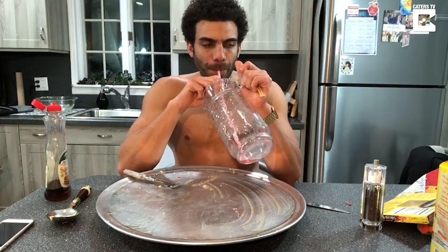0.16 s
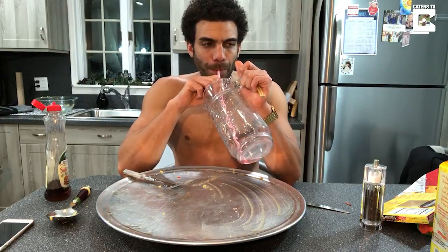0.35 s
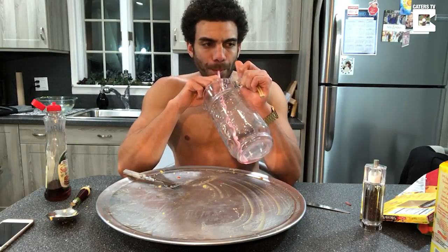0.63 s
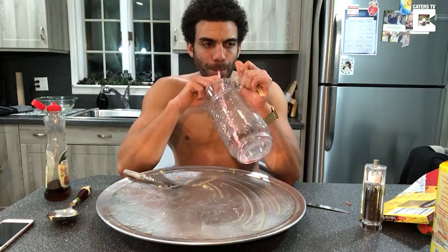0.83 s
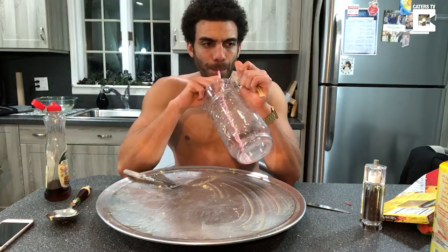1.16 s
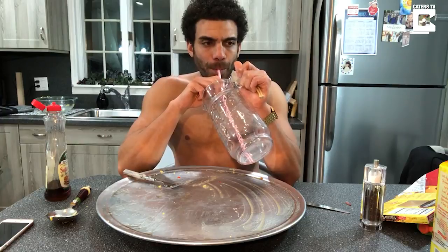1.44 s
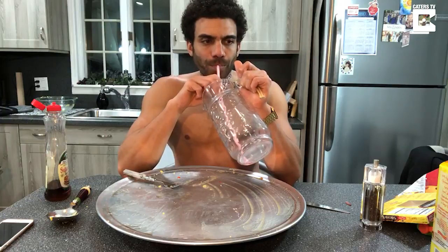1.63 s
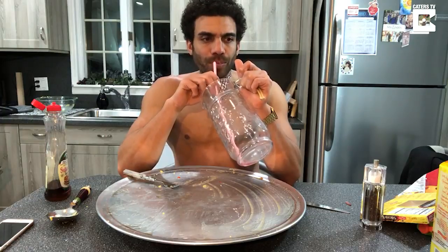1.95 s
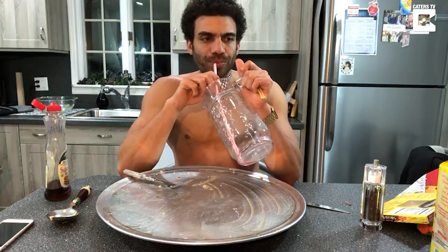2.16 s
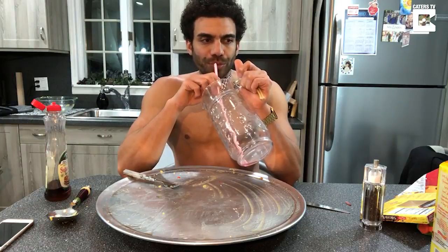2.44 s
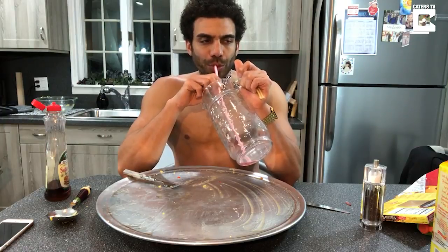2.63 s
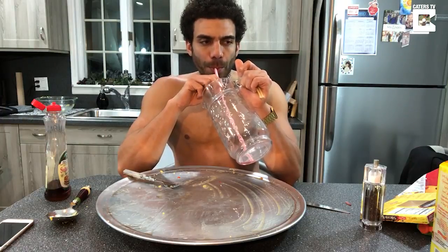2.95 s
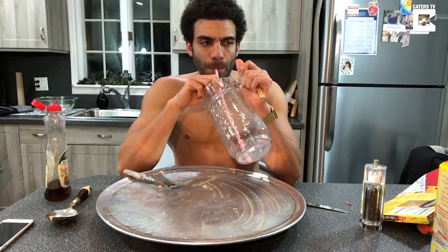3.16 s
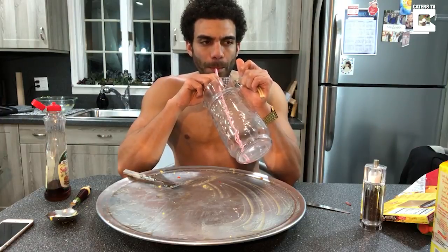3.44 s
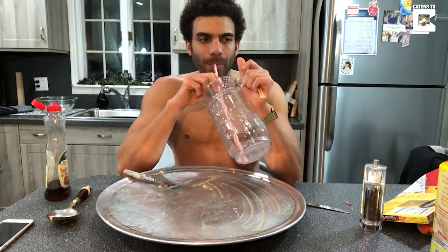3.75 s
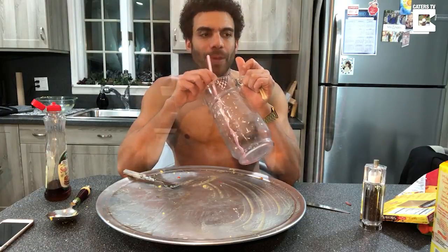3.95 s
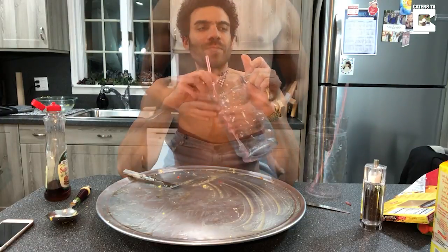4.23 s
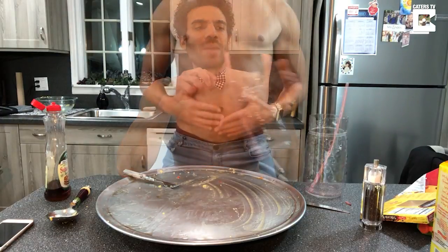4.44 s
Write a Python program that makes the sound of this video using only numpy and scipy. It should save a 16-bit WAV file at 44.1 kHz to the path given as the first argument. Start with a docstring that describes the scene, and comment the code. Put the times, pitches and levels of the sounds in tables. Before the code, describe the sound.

A close, mono take in a lightly reverberant kitchen, with very quiet, low-weighted air and a faint fridge whirr throughout. At about 0.5 s a straw begins pulling the dregs from a glass jug: first wet gulps and pops, then from 0.96 s air breaks in and the slurp turns louder, gurgling, frothy and crackling, with hollow low booms around 300 Hz. A faint straw tick on glass hides in it at 1.2 s. It breaks off around 1.3 s, leaving a short decay. Tiny lip clicks come at 1.7, 2.3 and 2.65 s. A second slurp runs from 2.8 to 3.3 s, less sprayy, with longer ringing gulps; a third, brief and raspier, from 3.45 to 3.7 s. A light glass tick follows at 3.87 s, a cluster of wet lip smacks at 3.95 s, then one strong hollow tongue cluck at 4.18 s. Soft hiss swells around 4.0-4.4 s, and a last minute lip click comes at 4.54 s.

```python
"""Straw in a nearly empty jug

In a kitchen, heard close: three pulls on a straw in a glass jug, with the room's decay under most sounds.
Gulps of air boom in the jug's cavity, films of drink pop in its resonances, spray crackles in the straw.
Straw ticks ring glass modes; lips click and a tongue cluck rings the mouth. Coloured noise makes the
kitchen air, the fridge and a hiss that swells near the end. The microphone signal is cut steeply on top."""
import sys
import numpy as np
from scipy import signal
from scipy.fft import rfft, irfft, next_fast_len
from scipy.io import wavfile
from scipy.ndimage import uniform_filter1d

SR = 44100
rng = np.random.default_rng(int(sys.argv[2]) if len(sys.argv) > 2 else 0)


def to_wav(s):
    """Save 16-bit WAV."""
    ch = np.atleast_2d(s).T  # columns
    pcm = np.round(np.clip(ch, -1, 1) * 32767)  # PCM
    wavfile.write(sys.argv[1], SR, pcm.astype(np.int16))


N = 202141
T = np.arange(N) / SR
BRIEF = T[:SR // 5]

# All table levels are relative; each source sets its share of the mix.
# Pulls: drink comes first, then air breaks into the straw, then the suction eases.
# Each row: start in seconds, air breaks in at seconds, eases off at seconds, strength in dB,
# extra spray in dB, boom build-up in seconds.
PULLS = [(0.559, 0.963, 1.269, -0.5, -0.5, 0.075), (2.805, 3.023, 3.28, -0.5, -7.5, 0.1),
         (3.439, 3.467, 3.675, -2.5, 1.5, 0.21)]
# Biggest gulps of air. Each row: start in seconds, level in dB, pitch it settles to in Hz, t60 in seconds.
GULPS = [(.579, -20.5, 466, 0.011), (0.643, -30, 316, 0.044), (.704, -33.5, 294.6, 0.21),
         (0.82, -29.5, 334, .054), (0.918, -43, 291, .15), (.991, -27, 287, .12),
         (1.104, -22.5, 313, 0.057), (1.176, -23.5, 289, 0.077), (1.23, -29, 386, 0.088),
         (1.322, -31, 345, 0.069), (2.771, -40.5, 497, 0.091), (2.881, -30.5, 291, 0.13),
         (3.023, -34, 289, 0.31), (3.078, -30.5, 505, 0.15), (3.151, -31.5, 496, 0.17),
         (3.267, -24.5, 302.6, 0.28), (3.459, -30, 490, 0.11), (3.547, -29, 461, 0.14),
         (3.63, -30.5, 308.6, 0.62), (3.711, -37, 429.6, 0.096), (3.980, -47.5, 305, 0.24)]
# Loudest bursting films of drink. Each row: start in seconds, tone level in dB, pitch in Hz, splash level in dB.
FILM_POPS = [(.529, -46.5, 913, -58), (.558, -48, 1390, -58), (.608, -32.5, 1667, -58),
             (.644, -39.5, 1860, -47.5), (.758, -34.5, 1700, -44.5), (.836, -34.5, 1620, -39.5),
             (.849, -34, 2215, -41.5), (.959, -53, 3730, -35.5), (.966, -35, 970, -36.5),
             (.990, -31.5, 1690, -35), (1.048, -35, 2190, -37.5), (1.094, -33, 1730, -69),
             (1.133, -35, 2150, -56), (1.160, -41, 1740, -43.5), (1.187, -30, 1690, -33),
             (1.33, -57, 2250, -53.5), (2.807, -34, 1006, -56), (2.858, -51, 5220, -61),
             (2.941, -49.5, 6760, -54.5), (2.972, -32.5, 1018, -65), (3.027, -27, 1730, -39.5),
             (3.048, -53, 1810, -40), (3.081, -36.5, 980, -35.5), (3.150, -30.5, 2200, -40.5),
             (3.174, -30.5, 1740, -41.5), (3.253, -37, 1060, -40.5), (3.457, -36, 1030, -58),
             (3.495, -36, 960, -43), (3.546, -45, 1420, -30.5), (3.651, -34, 1800, -38)]
# Lips parting. Each row: start in seconds, level in dB, pitch in Hz, t60 in seconds.
LIP_SMACKS = [(1.672, -51.5, 4500, 0.016), (2.309, -52, 1350, 0.012), (2.648, -58.5, 2280, 0.039),
              (3.938, -43, 3050, 0.017), (3.94, -46, 5180, 0.028), (3.948, -35.5, 4110, 0.019),
              (3.949, -36.5, 5010, 0.015), (3.952, -44, 1670, 0.02), (4.538, -55.5, 7100, 0.013)]
# The tongue leaves the palate in two steps. Each row: start in seconds, level in dB.
TONGUE_STEPS = [(4.184, -11.5), (4.186, -6.5)]
# Straw against the glass. Each row: start in seconds, level in dB, pitch of the contact in Hz (lower is softer).
STRAW_TAPS = [(1.188, -45.5, 1630), (3.874, -48, 6150)]

# How each sound follows a pull. Each row: level in dB, drop before the air breaks in in dB,
# sag after it in dB/s (negative grows), release in dB/s.
BOOM_LAW = (-37.5, 3.5, -8, 119)
SLUG_LAW = (-43, 9, 7, 150)
FROTH_LAW = (-41, 15, 25, 130)
SPRAY_LAW = (-50, 13, 39, 108)

# The jug's neck-and-belly resonance. Each row: frequency in Hz, width in Hz, level in dB.
CAVITY_MODES = [(292.6, 9.4, -2), (326.5, 21.6, -11.5)]
# Mouth and straw, as slugs of drink excite them. Each row: frequency in Hz, width in Hz, level in dB.
SLUG_MODES = [(135.8, 10.7, -3), (172.4, 16.6, -3), (232.2, 4.9, 7), (373.5, 16, 1), (431, 39.5, 4),
              (500.5, 30.6, 2), (594, 87, -8.5)]
# Air in jug and straw. Each row: frequency in Hz, width in Hz, level in dB.
JUG_AIR_MODES = [(917, 94, -6.5), (1020, 37.4, 5.5), (1118, 22, -6), (1351, 56, -6), (1610, 70, -11),
                 (1750, 77, -4), (1886, 47, -5), (2130, 13, -23), (2228, 47, -7.5), (2488, 49, -5.5),
                 (2748, 22, -10), (2914, 46, -5.5), (3120, 24, -20), (3380, 12, -15)]
# Higher resonances of the straw. Each row: frequency in Hz, width in Hz, level in dB.
STRAW_MODES = [(3667, 19, 3), (4020, 230, -21), (4660, 23, -15), (4620, 97, -4), (4860, 39, 2.5),
               (5340, 210, -1.5), (5820, 79, -4), (5850, 40, -25), (6190, 23, -10.5), (6540, 126, -2.5),
               (7040, 95, -7.5), (7470, 200, -8.5), (7830, 80, -6.5), (8510, 41, -7.5)]
# The open mouth during the cluck. Each row: frequency in Hz, width in Hz, level in dB.
MOUTH_MODES = [(657, 77, 4.5), (930, 390, -0.5), (1230, 120, 7.5), (1760, 220, 1.5), (3830, 160, -9),
               (5550, 460, -18.5)]
# The glass wall. Each row: frequency in Hz, level in dB, t60 in seconds.
GLASS_MODES = [(1807, -2, 0.66), (2030, -42, 0.27), (2460, -31, 1), (3730, -1, 0.086), (4700, -11, 0.13),
               (5600, -10, 0.16), (6500, -8, 0.14), (8400, -18, 0.42), (8748, -14, 0.037),
               (10800, -11, 0.15), (11800, -8, .09)]
# The fridge's whirr. Each row: frequency in Hz, width in Hz, level in dB.
FRIDGE_MODES = [(129, 39, -3), (906, 220, -4), (1691, 16, 1), (4380, 700, -15)]

# Colour of the spray in the straw. Each row: frequency in Hz, density in dB per Hz.
SPRAY_COLOUR = [(1880, -34), (3200, 5.5), (3400, -46), (3760, 2.5), (4620, 2), (5010, -16), (6120, -9.5),
                (6810, -15), (7330, -13), (7890, -7), (8600, -14.5), (9320, -9), (10000, -15.5),
                (14800, -20), (15800, -19)]
# Colour of the kitchen air. Each row: frequency in Hz, density in dB per Hz.
AIR_COLOUR = [(15, -38), (25, -15), (64, 0), (123, -1), (152, -8), (333, -3), (500, -6), (572, -7.5),
              (881, -14.5), (1390, -16), (1680, -15), (2150, -16), (4950, -19), (13800, -35.5),
              (15800, -38)]
# Colour of the brighter hiss. Each row: frequency in Hz, density in dB per Hz.
HISS_COLOUR = [(59, -19), (100, -7.5), (301, -8), (356, -7.5), (500, 0.5), (568, -17.5), (886, -9.5),
               (4430, -17.5), (15800, -33.5)]
# Course of that hiss. Each row: time in seconds, level in dB.
HISS_COURSE = [(0, -100), (3.8, -74.5), (4.05, -61), (4.35, -61), (4.58, -69.5)]
# Kitchen decay. Each row: frequency in Hz, t60 in seconds.
ROOM_T60 = [(250, 0.48), (1000, 0.36), (4000, 0.38), (12000, 0.3)]

PRIMING_DB_PER_S = 10   # the suction grows until the air breaks in
BREAK_IN_S = 0.0068     # time the air takes to open the straw; each pull also fades in over it
BOOM_BUILD_DB = 5.5     # the boom builds up by this much from the start of each pull
GULP_SWELL_S = 0.003
PLUG_S, PLUG_DEPTH_DB = 0.021, 1.5   # before a gulp: time of the full choke, and how far the gurgle sinks
SPURT_SPREAD_DB = 4
# The rush after a listed pop: t60, then froth and spray relative to the pop's splash level.
SURGE_S, SURGE_FROTH_DB, SURGE_SPRAY_DB = 0.092, -7.5, -14.5
# Finest mist: level at the strongest flow, and the power of the flow it follows.
FIZZ_DB, FIZZ_STEEPNESS = -21, 2.3
# Lesser pops come at uneven intervals; their levels are relative to the froth.
SMALL_POPS_PER_S, SMALL_POP_DB, SMALL_SPLASH_DB, SMALL_POP_SPREAD_DB = 22, -6, -3.5, 3.5
SMALL_POP_LOW_HZ, SMALL_POP_HIGH_HZ = 960, 2130
AIR_DB, FRIDGE_DB = -66.5, -69.5
CUTOFF_HZ = 15750


def suction(law, build_db=0, extra_spray=False):
    """Strength of one sound over the pulls: it primes, jumps as air breaks in, sags and is released."""
    level_db, drop_db, sag_db_per_s, release_db_per_s = law
    out = np.zeros(N)
    for start, break_in, ease, pull_db, spray_db, build_s in PULLS:
        building = build_db * np.clip(1 - (T - start) / build_s, 0, 1)
        drop = drop_db * np.clip((break_in - T) / BREAK_IN_S, 0, 1)
        priming = drop + PRIMING_DB_PER_S * np.maximum(break_in - T, 0)
        sag = sag_db_per_s * (np.clip(T, break_in, ease) - break_in)
        fading = sag + release_db_per_s * np.maximum(T - ease, 0)
        db = level_db + pull_db + extra_spray * spray_db - building - priming - fading
        out += from_db(db) * np.clip((T - start) / BREAK_IN_S, 0, 1)
    return out


def plugged():
    """Drink plugs the straw: the gurgle chokes just before each big gulp and is freed by it."""
    chokes = [np.clip(2 - (s - T) / PLUG_S, 0, 1) * (T < s) for s, *_ in GULPS]
    choke = np.max(chokes, axis=0)
    return from_db(-PLUG_DEPTH_DB * uniform_filter1d(choke, size=64))


def spurts(per_s=70, t60=0.031):
    """Air breaks through in sudden spurts that die away over a steady leak."""
    kicks = np.abs(grains(per_s, SPURT_SPREAD_DB))
    return from_db(-1.0) + signal.fftconvolve(kicks, dying(BRIEF, t60))[:N]


def surges():
    """Each listed pop opens the straw to a short rush of air."""
    out = np.zeros(N)
    for s, _, _, splash_db in FILM_POPS:
        add(out, s, from_db(splash_db) * dying(BRIEF, SURGE_S))
    return out


def gurgle(boom, slug):
    """Slugs of drink break off at the straw's tip and kick the air in the jug."""
    kicks = grains(per_s=150, spread_db=2.5)
    cavity = evened(band(resonate(kicks, CAVITY_MODES), 290.4, 420), span_s=0.015)
    slugs = evened(band(resonate(kicks, SLUG_MODES), 131, 1530), span_s=0.034)
    return from_db(-2.0) * boom * cavity + from_db(1.4) * slug * slugs


def gulps(rise=0.0067):
    """A large gulp rings one low resonance, rising a little as it dies."""
    out = np.zeros(N)
    for s, db, hz, t60 in GULPS:
        fade = dying(BRIEF, t60)
        swell = 1 - np.exp(-(BRIEF / GULP_SWELL_S) ** 2)
        tone = np.sin(2 * np.pi * np.cumsum(hz * (1 - rise * fade)) / SR)
        add(out, s, from_db(db) * tone * fade * swell)
    return band(out, 133, 3400)


def pops(foam):
    """Each bursting film rings briefly, throws a splash and wakes the jug's air."""
    tones, splashes = np.zeros((2, N))
    for s, db, hz, splash_db in list(FILM_POPS) + small_pops(foam):
        add(tones, s, from_db(db) * blip(hz, t60=0.023))
        splash = rng.standard_normal(len(BRIEF)) * dying(BRIEF, 0.02)
        add(splashes, s, from_db(splash_db) * splash)
    snaps = from_db(-3.0) * band(splashes, 1200, 7000) + from_db(-1) * straw(splashes)
    ringing = resonate(from_db(-24.0) * tones + from_db(21.5) * splashes, JUG_AIR_MODES)
    thumps = from_db(6.5) * band(splashes, 375, 860)   # the air let in pushes the drink
    return kitchen(from_db(-2.5) * tones + snaps + ringing + thumps, wet_db=-3.5)


def small_pops(foam):
    """Lesser films burst at uneven intervals, as strongly as the froth allows; rows as in FILM_POPS."""
    wait, pitch, size = rng.random((256, 3)).T
    s = np.cumsum(.5 + wait) / SMALL_POPS_PER_S
    froth_db = 20 * np.log10(np.interp(s, T, foam) + 1e-9)
    db = froth_db + SMALL_POP_SPREAD_DB * (2 * size - 1)
    hz = SMALL_POP_LOW_HZ * (SMALL_POP_HIGH_HZ / SMALL_POP_LOW_HZ) ** pitch
    rows = np.transpose([s, db + SMALL_POP_DB, hz, db + SMALL_SPLASH_DB])
    return list(rows[s < T[-1]])


def froth(strength, flow):
    """Countless small films pop, each at its own pitch, into the resonances of the jug."""
    pitches = np.geomspace(900, 3100, 14)
    films = sum(resonate(grains(per_s=30, spread_db=7.0), [(hz, hz / 4, 0)]) for hz in pitches)
    bubbles = flow * films
    ringing = resonate(bubbles, JUG_AIR_MODES) + from_db(-14.5) * bubbles
    in_room = kitchen(band(ringing, 600, 2630), wet_db=-9)
    return from_db(-4.5) * strength * evened(in_room, span_s=0.02)


def spray(strength, flow):
    """Droplets torn along the straw crackle finely; the pitched ones ring for a few cycles."""
    pitches = np.geomspace(3400, 15000, 14)
    droplets = sum(resonate(grains(per_s=56, spread_db=3.0), [(hz, hz / 12, 0)]) for hz in pitches)
    fine = grains(per_s=1500, spread_db=-2.0)
    crackle = flow * (rms_one(droplets) + from_db(0.5) * rms_one(fine))
    piped = straw(crackle) + from_db(-20.5) * band(crackle, 9000, 15300)
    return from_db(-1.5) * strength * evened(kitchen(piped, wet_db=-1), span_s=0.021)


def fizz(strength, flow):
    """The finest mist hisses mostly while the air runs fastest."""
    hiss = band(flow * grains(per_s=4000, spread_db=11.0), 10000, 16500)
    top = strength.max()
    level = from_db(FIZZ_DB) * top * (strength / top) ** FIZZ_STEEPNESS
    return level * evened(hiss, span_s=0.071)


def straw(x):
    """Sound heard through the straw: a broad hiss colour with pipe resonances on it."""
    return from_db(-7.0) * coloured(x, SPRAY_COLOUR) + from_db(7.5) * resonate(x, STRAW_MODES)


def smacks():
    """Wet lips part with short clicks."""
    out = np.zeros(N)
    for s, db, hz, t60 in LIP_SMACKS:
        crack = rng.standard_normal(len(BRIEF)) * dying(BRIEF, t60)
        add(out, s, from_db(db) * (click(hz, t60) + from_db(-22) * crack))
    return kitchen(out, wet_db=-8.0)


def cluck():
    """The tongue drops from the palate and the mouth rings for an instant."""
    release = np.zeros(N)
    for s, db in TONGUE_STEPS:
        add(release, s, from_db([db]))
    return kitchen(resonate(release, MOUTH_MODES) + from_db(-34) * release, wet_db=-4.5)


def glass():
    """The straw ticks on the wall; each contact favours the modes near its own pitch."""
    out, t = np.zeros(N), T[:SR]
    for s, db, contact_hz in STRAW_TAPS:
        add(out, s, from_db(db - 7) * click(contact_hz, t60=0.012))
        for hz, mode_db, t60 in GLASS_MODES:
            reach = 1 / (1 + np.log2(hz / contact_hz) ** 4)
            ring = np.sin(2 * np.pi * hz * t) * dying(t, t60)
            add(out, s, from_db(db + mode_db) * reach * ring)
    return out


def blip(hz, t60):
    """A pocket of air opens and rings for a few cycles, under an envelope that peaks at one."""
    fade = dying(BRIEF, t60) * (1 - np.exp(-BRIEF / 0.00029))
    return np.sin(2 * np.pi * hz * BRIEF) * fade / fade.max()


def click(hz, t60):
    """A ragged blip: a tone with dying noise in a band around its pitch."""
    noise = rng.standard_normal(len(BRIEF) + 2000)
    rough = rms_one(band(noise, hz / 1.65, hz * 1.28))[2000:]   # skips the filter's onset
    return from_db(-1.0) * blip(hz, t60) + from_db(-2.5) * rough * dying(BRIEF, t60)


def background():
    """Still kitchen air, the fridge's resonances, and a hiss that swells near the end: shaped noise."""
    white = rng.standard_normal((3, N))
    air = from_db(AIR_DB) * coloured(white[0], AIR_COLOUR)
    fridge = from_db(FRIDGE_DB) * rms_one(resonate(white[1], FRIDGE_MODES))
    hiss_db = np.interp(T, *np.transpose(HISS_COURSE))
    hiss = from_db(hiss_db) * coloured(white[2], HISS_COLOUR)
    return air + fridge + hiss


def kitchen(x, wet_db):
    """Direct sound plus a diffuse noise tail that decays at its own rate in each band."""
    t, tail = T[:SR // 2], 0
    edges = np.geomspace(100, 16000, 8)
    for low, high in zip(edges, edges[1:]):
        noise = band(rng.standard_normal(len(t)), low, high)
        tail = tail + noise * dying(t, at_hz(ROOM_T60, np.sqrt(low * high)))
    tail = tail * np.clip((t - .002) / 0.0013, 0, 1)   # the room answers after 2 ms
    return x + from_db(wet_db) * signal.fftconvolve(x, tail / np.linalg.norm(tail))[:N]


def grains(per_s, spread_db):
    """Clicks at random moments and of either sign, a few far from the rest in size."""
    sizes = from_db(spread_db * np.minimum(rng.exponential(1, N), 4)) * rng.choice([-1, 1], N)
    return sizes * (rng.random(N) < per_s / SR)


def resonate(x, modes):
    """Parallel two-pole resonances with alternating signs."""
    out = 0
    for k, (hz, width, db) in enumerate(modes):
        r = np.exp(-np.pi * width / SR)
        poles = [1, -2 * r * np.cos(2 * np.pi * hz / SR), r * r]
        ring = signal.lfilter([1, 0, -1], poles, x + 1e-18)
        out = out + (-1) ** k * from_db(db) * (1 - r * r) / 2 * ring
    return out


def coloured(x, spectrum):
    """Give a sound a smooth spectrum, keeping the power of white noise."""
    size = next_fast_len(2 * len(x))
    gain = from_db(at_hz(spectrum, np.arange(size // 2 + 1) * SR / size))
    return irfft(rfft(x, size) * rms_one(gain), size)[:len(x)]


def band(x, low_hz, high_hz):
    """Band-pass between two frequencies."""
    edges = [low_hz, min(high_hz, SR / 2 - 1000)]
    return signal.sosfilt(signal.butter(2, edges, "band", fs=SR, output="sos"), x + 1e-18)


def evened(x, span_s):
    """Hold the slow level at one; faster unevenness stays."""
    size = max(int(span_s * SR), 2)
    power = uniform_filter1d(uniform_filter1d(x * x, size), size)
    return x / np.sqrt(np.maximum(power, 0) + 1e-4 * np.mean(x * x))


def dying(t, t60):
    """Exponential decay by 60 dB in t60 seconds."""
    return np.exp(-np.log(1000) * t / t60)


def add(track, s, sound):
    """Lay a sound into a track at time s."""
    start = int(s * SR)
    track[start:start + len(sound)] += sound[:N - start]


def at_hz(points, hz):
    """Read a spectrum on a log-frequency axis."""
    f, value = np.transpose(points)
    return np.interp(np.log(np.maximum(hz, 1)), np.log(f), value)


def from_db(db):
    """Amplitude factor of a level in dB."""
    return 10 ** (np.asarray(db) / 20)


def rms_one(x):
    """Scale to an RMS of one."""
    return x / np.sqrt(np.mean(x ** 2) + 1e-20)


def scene():
    """The slurp, then lips, tongue, glass and background, mixed to one channel."""
    open_tip, rush, flow = plugged(), surges(), spurts()
    boom = open_tip * suction(BOOM_LAW, build_db=BOOM_BUILD_DB)
    slug = open_tip * suction(SLUG_LAW)
    steady_foam = suction(FROTH_LAW)
    foam = np.hypot(steady_foam, from_db(SURGE_FROTH_DB) * rush)
    mist = np.hypot(suction(SPRAY_LAW, extra_spray=True), from_db(SURGE_SPRAY_DB) * rush)
    slurp = gurgle(boom, slug) + gulps() + pops(steady_foam)
    slurp = slurp + froth(foam, flow) + spray(mist, flow) + fizz(mist, flow)
    return (slurp + smacks() + cluck() + glass() + background())[None]


def record(dry):
    """The microphone signal loses its top to a steep elliptic low-pass."""
    return signal.sosfilt(signal.ellip(10, .1, 70, CUTOFF_HZ, fs=SR, output="sos"), dry)


dry = scene()
out = record(dry)
to_wav(out)
```